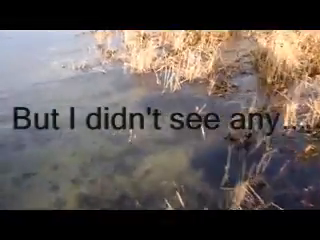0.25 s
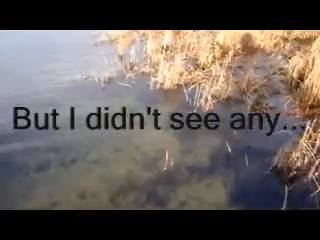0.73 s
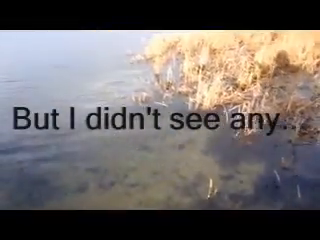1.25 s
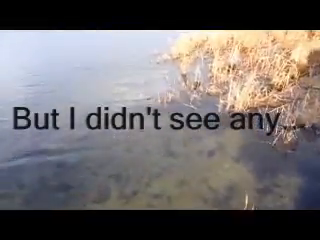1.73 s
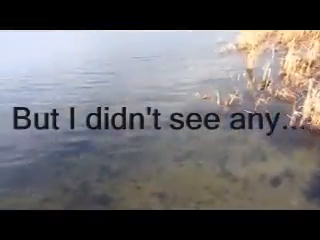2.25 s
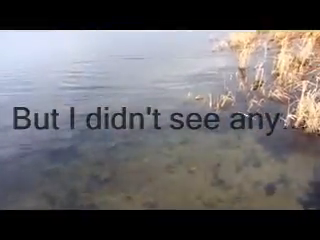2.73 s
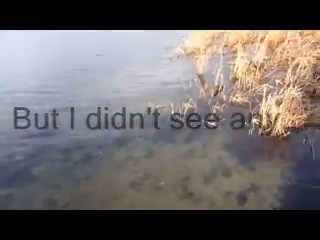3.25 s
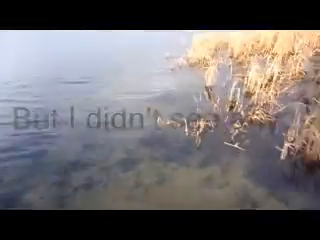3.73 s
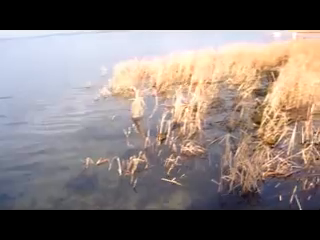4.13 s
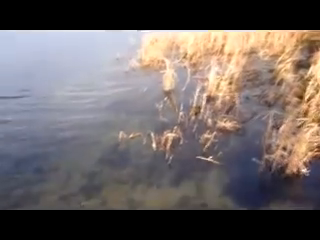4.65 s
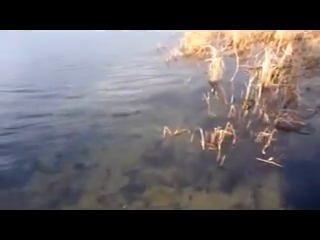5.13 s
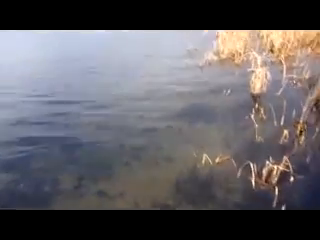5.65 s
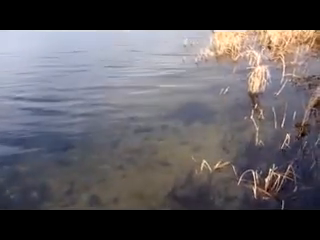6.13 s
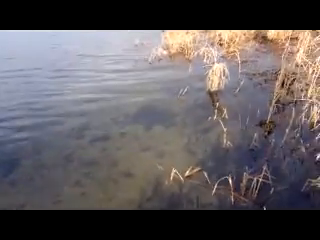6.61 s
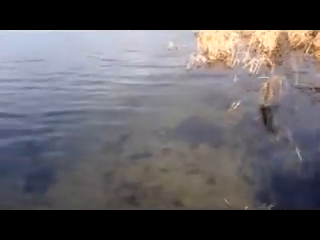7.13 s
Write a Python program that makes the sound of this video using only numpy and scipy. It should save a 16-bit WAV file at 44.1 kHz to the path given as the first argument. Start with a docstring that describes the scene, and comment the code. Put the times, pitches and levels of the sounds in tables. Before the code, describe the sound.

A quiet lake shore, close to the water, over a faint soft hush of distant water, air and microphone hiss. From 0 s small wavelets gurgle and fizz in uneven swells, with rounded plops around 0.7 s and tiny droplet ticks. Between about 1.1 and 2.9 s light wind buffets the microphone in low, dull thumps, strongest near 1.9 s, while lapping continues; a plop and bright drop land at 2.1 s. At 3.1 s a fuller gurgle bursts with a cluster of droplets, then ebbs. At 3.9 s a dry reed snaps loudly and sharply, followed by a tiny crackling tear ending by 4.05 s. Hollow plops follow at 4.6-4.7 s, with bubbling and drips through 5.5 s. A faint high chirp, perhaps a bird, passes near 6 s. Another splashy lap comes at 6.4-6.5 s, then small plops and fizz until about 7.4 s.

```python
"""Small waves lap among dry reeds at a lake shore: water gurgles and plops, droplets tick, foam fizzes.
A reed stalk snaps and tears; wet slaps tick and light gusts buffet the microphone over a far hush.
Water is made of decaying bubble tones and bursting-film clicks, the reed of clicks ringing a damped stalk,
wind of lumpy low noise, the hush of flickering noise bands; thin whistles and a whine lie near silence."""
import sys
import numpy as np
from scipy import signal
from scipy.io import wavfile
from scipy.ndimage import uniform_filter1d

SR = 44100
rng = np.random.default_rng(int(sys.argv[2]) if len(sys.argv) > 2 else 0)


def voltage_ratio(level):
    """Linear amplitude factor for a level in decibels (scalar or array-like)."""
    return 10 ** (np.asarray(level, float) / 20)


def master_out(mix):
    """Clip the mix to full scale and print it as 16-bit PCM to the path in sys.argv[1]."""
    frames = np.transpose(np.atleast_2d(mix))
    ceiling = np.clip(frames, -1, 1)
    pcm = np.round(ceiling * 32767).astype(np.int16)
    wavfile.write(sys.argv[1], SR, pcm)


N = 325458

# colour of the foam, as resonances: (frequency [Hz], width [Hz], level [dB])
FOAM_RESONANCES = [(1725, 430, 5), (2300, 1090, 2.5), (3550, 416, 3.5), (6270, 5300, -6.5)]


def rms_one(x):
    """Scale to rms 1."""
    return x / np.sqrt(np.mean(x ** 2) + 1e-20)


def in_time(rows):
    """Interpolate the columns of a (time, values...) table at every sample."""
    s, *columns = np.transpose(rows)
    return [np.interp(np.arange(N) / SR, s, c) for c in columns]


def drift(rate):
    """Slow random curve of rms 1, about rate changes a second, smoothed at a 40th of the sample rate."""
    r = np.exp(-80 * np.pi * rate / SR)
    slow = signal.lfilter([1], [1, -2 * r, r * r], rng.standard_normal(N // 40 + 2002))
    slow = slow[2000:]   # skip the filter's start
    return np.interp(np.arange(N) / 40, np.arange(len(slow)), rms_one(slow))


def band(x, low_hz, high_hz, order=2):
    """Butterworth band-pass."""
    return signal.sosfilt(signal.butter(order, [low_hz, high_hz], "band", fs=SR, output="sos"), x)


def resonances(x, peaks):
    """Parallel two-pole resonances with alternating signs; a wider one dies sooner."""
    out = 0
    for k, (hz, width_hz, level_db) in enumerate(peaks):
        r = np.exp(-np.pi * width_hz / SR)
        ring = signal.lfilter([1, 0, -1], [1, -2 * r * np.cos(2 * np.pi * hz / SR), r * r], x + 1e-18)
        out = out + (-1) ** k * voltage_ratio(level_db) * (1 - r * r) / 2 * ring
    return out


def grains(per_s, spread_db):
    """Random clicks of either sign, a few much stronger than the rest."""
    sizes = voltage_ratio(spread_db * np.minimum(rng.exponential(1, N), 4)) * rng.choice([-1, 1], N)
    return sizes * (rng.random(N) < per_s / SR)


def clicks_at(rows):
    """A single sample at each row's time, as high as the row's level."""
    out = np.zeros(N)
    times, levels = np.array(rows)[:, 0], np.array(rows)[:, 1]
    out[(times * SR).astype(int)] = voltage_ratio(levels)
    return out


def hush():
    """Far water, air and microphone hiss: third-octave bands of noise that flicker slightly."""
    # relative noise density: (frequency [Hz], level [dB per Hz])
    spectrum = [(20, -6.5), (60, -11.5), (240, 1.5), (820, 2), (1430, -3), (3500, -8), (6400, -10.5),
                (9000, -16), (10500, -22), (13000, -23), (15500, -49)]
    edges = 20 * 2 ** (np.arange(30) / 3)
    hz, level_db = np.transpose(spectrum)
    white = rng.standard_normal((2, N))   # neighbouring bands use different noise
    out = 0
    for k, (low, high) in enumerate(zip(edges, edges[1:])):
        gain_db = np.interp(np.log(low * high) / 2, np.log(hz), level_db)
        flicker_db = 1.0 * drift(1.6)
        out = out + voltage_ratio(gain_db + flicker_db) * band(white[k % 2], low, high)
    return voltage_ratio(-55) * rms_one(out)


def electronic_whine():
    """A very high, thin sine from the electronics."""
    # lines: (frequency [Hz], rms level [dB])
    lines = [(15628, -71.5)]
    t = np.arange(N) / SR
    tones = sum(np.sqrt(2) * voltage_ratio(level_db) * np.sin(2 * np.pi * hz * t) for hz, level_db in lines)
    return tones * voltage_ratio(3.3 * drift(2.6))


def whistles():
    """Faint far-off whistles, perhaps birds: gliding sines with an uneven, warbling voice."""
    # one curve a whistle: (time [s], frequency [Hz], rms level [dB]), both before warbling
    glides = [
        [(.055, 11400, -75), (.115, 10000, -75)],
        [(.2, 10300, -84), (.25, 11400, -77), (.34, 10650, -76), (.42, 10900, -79)],
        [(1.1, 10500, -78), (1.125, 11000, -76), (1.15, 10200, -78)],
        [(5.75, 10100, -76), (5.775, 10450, -77), (5.79, 11000, -76)],
        [(5.93, 8400, -76), (5.98, 8650, -71), (6.01, 8300, -76)],
        [(6.012, 11500, -80), (6.04, 10550, -67), (6.085, 10100, -76), (6.17, 9950, -81)],
    ]
    t = np.arange(N) / SR
    out = np.zeros(N)
    for rows in glides:
        hz, level_db = in_time(rows)
        hz = hz + 60 * drift(60)
        level_db = level_db + 3.0 * drift(40)
        sounding = 1. * (t > rows[0][0]) * (t < rows[-1][0])
        inside = uniform_filter1d(sounding, size=441)   # 10 ms fades
        out = out + inside * np.sqrt(2) * voltage_ratio(level_db) * np.sin(2 * np.pi * np.cumsum(hz) / SR)
    return out


def wind():
    """Eddies push the diaphragm: lumpy low noise, and single lumps of about one swing."""
    # wind on the microphone port: (time [s], level [dB])
    gusts = [(0.0, -59), (0.45, -66), (0.7, -56), (0.72, -70), (0.8, -47), (0.86, -74), (1.01, -57),
             (1.76, -47.5), (2.11, -54.5), (2.18, -62), (2.3, -46.5), (2.44, -57.5), (2.5, -50),
             (2.75, -56.5), (2.79, -51), (3.12, -68.5), (5.21, -61), (5.73, -68.5), (5.87, -53.5),
             (6.03, -57.5), (6.85, -70), (7.37, -63)]
    # single strong eddies before the band-pass: (time of the crest [s], level [dB])
    thumps = [(0.5993, -36.5), (.6795, -43), (.8081, -54), (1.1635, -36), (1.4217, -35.5), (1.4545, -35.5),
              (1.6407, -32.5), (1.6595, -37), (1.6935, -40), (1.7543, -44), (1.7818, -35.5), (1.9064, -29),
              (2.0234, -34), (2.0609, -37), (2.0943, -33.5), (2.2963, -35), (2.3635, -46), (2.392, -45),
              (2.4747, -42), (2.5211, -39), (2.5766, -40), (2.675, -44), (2.8031, -40), (2.835, -45),
              (5.861, -39)]
    flutter_db, thump_hz, thump_s = 1.2, 200, 0.0024
    eddies = band(grains(400, 2.1), 75, 250, order=1) * voltage_ratio(flutter_db * drift(10.3))
    eddies = band(eddies, 62, 493, order=3)
    t = np.arange(-600, 601) / SR
    swing = np.cos(2 * np.pi * thump_hz * t) * np.exp(-(t / thump_s) ** 2)
    pulls = signal.fftconvolve(-clicks_at(thumps), swing, "same")   # each eddy sucks at the port
    pulls = band(pulls, 68, 900, order=1)
    return voltage_ratio(in_time(gusts)[0]) * rms_one(eddies) + pulls


def churning():
    """Gurgle and fizz gains: each wavelet swells, churns and ebbs; their powers add."""
    # wavelets reaching the reeds:
    # (time the crest arrives [s], churning [s], gurgle level [dB], fizz level [dB])
    wavelets = [(0.0, 0.063, -57, -61.5), (.42, 0.35, -57, -59.5), (1.17, 0.22, -52, -56),
                (1.5, 0.31, -59.5, -56), (2.12, 0.055, -56.5, -58), (2.78, 0.31, -54.5, -63.5),
                (3.12, .18, -49.5, -52.5), (3.6, 0.3, -61.5, -60.5), (4.36, 0.1, -62, -66),
                (4.62, 0.22, -55, -61), (4.95, 0.17, -55, -57), (5.27, 0.074, -54.5, -57),
                (5.58, 0.031, -69, -58.5), (5.84, 0.16, -53, -60), (6.2, 0.027, -55.5, -61.5),
                (6.43, 0.12, -51.5, -52.5), (6.62, 0.058, -56, -58), (7.03, 0.055, -64, -62.5),
                (7.17, .2, -58, -60.5)]
    swell_db_per_s, ebb_db_per_s = 81, 54.5   # build before the crest, decay after the churning
    t, power = np.arange(N) / SR, 0
    for s, churn_s, gurgle_db, fizz_db in wavelets:
        swell_db = swell_db_per_s * np.maximum(s - t, 0)
        ebb_db = ebb_db_per_s * np.maximum(t - s - churn_s, 0)
        gains = voltage_ratio(np.array([[gurgle_db], [fizz_db]])) * voltage_ratio(-(swell_db + ebb_db))
        power = power + gains ** 2
    return np.sqrt(power)


def ticks():
    """Wet ticks: water slaps in bursts of noise decaying in 1.5 ms, clear ones and a faint random bed."""
    # clear ticks before filtering: (time [s], level [dB], pitch [Hz])
    clear_ticks = [(1.376, -40, 5030), (1.7638, -44, 4520), (2.1818, -41, 3000), (5.5061, -45, 3500),
                   (6.1769, -43.5, 4100)]
    fade = np.exp(-1 / (0.0015 * SR))
    noise = rng.standard_normal(N)
    fizz_gain = churning()[1]
    faint = voltage_ratio(-28) * fizz_gain * rms_one(grains(52, 2.6))   # 52 a second, following the foam
    faint_bursts = signal.lfilter([1], [1, -fade], np.abs(faint) + 1e-18) * noise
    out = voltage_ratio(6.5) * resonances(faint_bursts, FOAM_RESONANCES)
    for row in clear_ticks:
        pitch_hz = row[2]
        burst = signal.lfilter([1], [1, -fade], clicks_at([row]) + 1e-18) * noise
        out = out + voltage_ratio(9.5) * band(burst, 0.8 * pitch_hz, 1.44 * pitch_hz)
    return out


def reed():
    """Each breaking fibre clicks into the heavily damped stalk; close surfaces return it."""
    # strongest fibres breaking, as drive into the stalk: (time [s], level [dB])
    snaps = [(3.8977, -1.5), (3.9465, -40), (3.959, -35), (3.97, -31), (3.9749, -27.5), (3.9886, -34),
             (3.9914, -29), (3.9978, -14), (4.0037, -27), (4.0086, -23), (4.0117, -23), (4.0181, -21),
             (4.028, -34), (4.0329, -31)]
    # resonances of the stalk: (frequency [Hz], width [Hz], level [dB])
    stalk = [(1280, 260, -15), (2740, 660, -1.5), (3770, 780, 6.5), (6120, 1060, -5)]
    # the bending stalk's low creak: (frequency [Hz], width [Hz], level [dB])
    creak = [(1240, 290, -1.5)]
    # echoes off water and reeds nearby: (delay [s], level [dB])
    echoes = [(.0015, -16), (.0022, -13)]
    # fine crackle builds, holds and stops dead: times [s], drive levels [dB]
    tear_db = np.interp(np.arange(N) / SR, [3.943, 3.99, 4.034], [-48.5, -31.5, -31.5],
                        left=-120, right=-120)
    crackle = voltage_ratio(tear_db) * rms_one(grains(2500, 2.5))
    breaks = clicks_at(snaps)
    lead = int(0.00043 * SR)   # drive the stalk early, as its ring peaks this long after the click
    drive = voltage_ratio(14.0) * np.roll(breaks, -lead) + crackle
    direct = band(resonances(drive, stalk), 830, 8000, order=3)
    direct = direct + resonances(crackle, creak)
    direct = direct + voltage_ratio(-17.5) * band(breaks, 6900, 11400)   # the bare edge of the break
    returned = sum(voltage_ratio(level_db) * np.roll(direct, int(delay * SR)) for delay, level_db in echoes)
    return direct + returned


def add_bubble(out, s, peak_db, hz, ring_s, rise, attack_s):
    """One bubble: a sine that starts fast and dies along a bell curve while its pitch slides."""
    t = np.arange(int(3 * ring_s * SR)) / SR
    shape = (1 - np.exp(-t / attack_s)) * np.exp(-(t / ring_s) ** 2)
    pitch_hz = hz * 2 ** (rise * t)
    tone = np.sin(2 * np.pi * np.cumsum(pitch_hz) / SR) * shape / shape.max()
    at = int(s * SR)
    out[at:at + len(t)] += voltage_ratio(peak_db) * tone[:N - at]


def plops_and_drops():
    """Trapped air and droplets that stand out ring as bubbles; a droplet also splashes in a puff of noise."""
    # air pockets before wobble: (time [s], level [dB], pitch [Hz], ring [s], pitch rise [octaves per s])
    plops = [(.619, -46.5, 766, 0.03, 5), (.706, -36.5, 883, 0.013, 1.5), (.706, -42.5, 637, 0.02, 5.5),
             (.7973, -40, 638, 0.0016, 1.5), (1.101, -48.5, 980, 0.014, 1),
             (1.2193, -32.5, 726, 0.0016, 1.5), (1.266, -48, 900, .014, 10), (1.519, -43, 404, 0.014, 2),
             (2.11, -35.5, 354, 0.0063, 4.0), (2.115, -47, 803, 0.024, 2), (2.603, -48.5, 530, 0.017, -1),
             (2.852, -47.5, 387, 0.034, 7), (2.949, -47.5, 381, 0.018, 1), (3.1005, -36, 532, 0.019, 10),
             (3.139, -39.5, 673, 0.015, 7), (3.229, -44.5, 453, 0.021, -1.5), (3.858, -44, 923, 0.011, 0),
             (3.883, -46.5, 786, 0.018, 2), (4.571, -36, 559, 0.023, 4.5), (4.643, -40.5, 381, 0.027, 7),
             (4.706, -34, 620, 0.0071, 8), (4.719, -38, 648, 0.011, 5), (4.906, -44.5, 520, 0.016, 6),
             (5.009, -42.5, 379, 0.014, -3), (5.137, -44, 359, 0.027, -1), (5.371, -39.5, 564, 0.041, 23.5),
             (5.535, -44, 656, 0.03, 8), (6.185, -44, 383, 0.042, 1.5), (6.212, -41, 395, 0.027, 2),
             (6.4, -45, 378, 0.013, 1), (6.425, -37, 380, 0.0097, -2), (6.44, -42, 393, 0.0097, 4),
             (6.505, -39.5, 750, 0.0035, 3), (7.0163, -35, 698, 0.0011, -3), (7.04, -48, 1210, 0.015, 9),
             (7.155, -48, 579, 0.023, 2), (7.165, -49.5, 390, 0.025, 3)]
    # droplets before wobble: (time [s], level [dB], pitch [Hz])
    drops = [(0.5478, -44, 3490), (0.637, -45, 3550), (1.29, -50, 2500), (1.303, -47.5, 2300),
             (1.405, -43, 1650), (1.513, -45, 2300), (1.704, -49, 3250), (1.574, -43.5, 2050),
             (2.108, -35, 3680), (2.1604, -44, 2690), (2.32, -49.5, 3720), (2.717, -47, 1500),
             (3.071, -43, 1380), (3.0778, -41.5, 3540), (3.126, -50, 3630), (3.138, -50, 2100),
             (3.177, -39, 3400), (3.231, -42, 3090), (3.2592, -40.5, 2280), (3.2838, -42.5, 2130),
             (3.252, -48, 3670), (3.3376, -46, 3600), (3.387, -44.5, 2460), (3.716, -47, 1690),
             (4.581, -41, 2370), (4.9055, -44, 3500), (5.142, -39, 2480), (4.9801, -46.5, 3550),
             (5.1934, -52, 2550), (5.2372, -45, 2250), (5.2743, -45.5, 2580), (5.3008, -42, 1780),
             (5.3195, -41.5, 2110), (5.3701, -45.5, 2300), (6.173, -47.5, 1800), (6.42, -46, 1420),
             (6.432, -48, 3570), (6.4657, -48, 2100), (6.477, -43, 2100), (6.4955, -39.5, 3600),
             (6.4966, -35.5, 2370), (6.6377, -51, 2600), (6.6608, -43, 3460), (7.0524, -47, 3540),
             (7.163, -46.5, 1840)]
    fade = np.exp(-1 / (0.0039 * SR))
    puff = fade ** np.arange(900)
    out, noise, splashes = np.zeros(N), rng.standard_normal(N), np.zeros(N)
    for s, peak_db, hz, ring_s, rise in plops:
        add_bubble(out, s, peak_db, hz, ring_s, rise, attack_s=.0007)
    for s, peak_db, hz in drops:
        add_bubble(out, s, peak_db, hz, ring_s=10.7 / hz, rise=18.0, attack_s=.0009)
        at = slice(int(s * SR), int(s * SR) + len(puff))
        # coloured by the drop's pitch
        splashes[at] += voltage_ratio(peak_db) * band(puff * noise[at], 0.69 * hz, 1.41 * hz)
    wobble = voltage_ratio(0.71 * drift(84))   # the moving surface makes each note uneven
    return out * wobble + voltage_ratio(5.5) * splashes


def bubble_swarm(per_s, low_hz, high_hz, cycles, spread_db):
    """Bubbles born at random, dealt to 16 pitches over a range; smaller, higher ones die sooner."""
    clumping = voltage_ratio(2.5 * drift(7))
    born = grains(per_s * clumping, spread_db)
    dealt = rng.integers(0, 16, N)
    out = 0
    for k, hz in enumerate(np.geomspace(low_hz, high_hz, num=16)):
        out = out + resonances(born * (dealt == k), [(hz, hz / cycles, 0)]) * cycles
    return rms_one(out)


def lapping():
    """Gurgle of larger bubbles and fizz of small ones, swelling with each wavelet."""
    # pockets between the stalks: (frequency [Hz], width [Hz], level [dB])
    hollows = [(342, 300, -1.3), (627, 346, 2.5), (900, 363, 1), (1415, 340, -7.5)]
    gurgle_gain, fizz_gain = churning()
    large_bubbles = bubble_swarm(650, 297.8, 1530, cycles=14.8, spread_db=2.5)
    gurgle = rms_one(resonances(large_bubbles, hollows))
    pings = bubble_swarm(1200, 1300, 4180, cycles=15.3, spread_db=3.5)
    spray = rms_one(grains(4000 * voltage_ratio(4.0 * drift(34)), 1.0))   # films bursting in quick clusters
    foam = resonances(spray + 1.1 * pings, FOAM_RESONANCES)
    foam = rms_one(band(foam, 820, 11300))
    return gurgle_gain * gurgle + fizz_gain * foam


def scene():
    """All sources at one microphone, in the open."""
    background = hush() + electronic_whine() + whistles() + wind()
    shore = ticks() + reed() + plops_and_drops() + lapping()
    return (background + shore)[None]


def band_limit(x):
    """A steep low-pass at the top of the band."""
    return signal.sosfilt(signal.butter(12, 16240, fs=SR, output="sos"), x)


def record(dry):
    """The microphone port cancels a narrow band of treble, and a steep low-pass cuts the top."""
    notch_hz, notch_width_hz = 7944, 2090
    b, a = signal.iirnotch(notch_hz, notch_hz / notch_width_hz, fs=SR)
    mic = 1.021 * signal.lfilter(b, a, dry) + 0.055 * dry   # the dry part keeps the notch shallow
    mic = signal.sosfilt(signal.cheby2(16, 50, 15900, fs=SR, output="sos"), mic)
    return band_limit(mic)


dry = scene()
out = record(dry)
master_out(out)
```